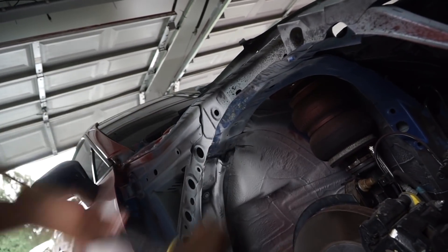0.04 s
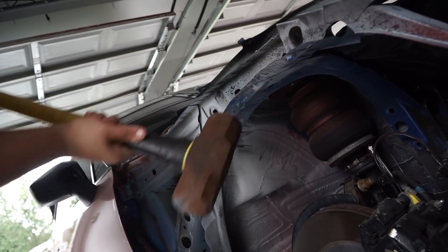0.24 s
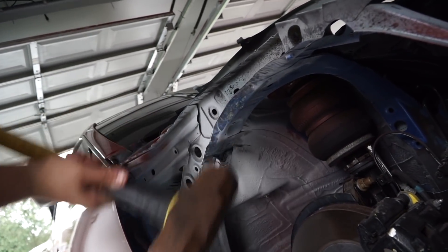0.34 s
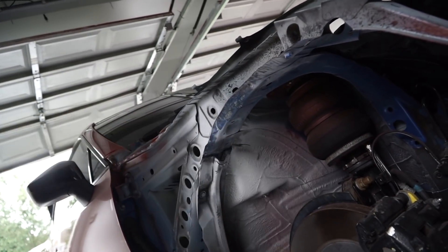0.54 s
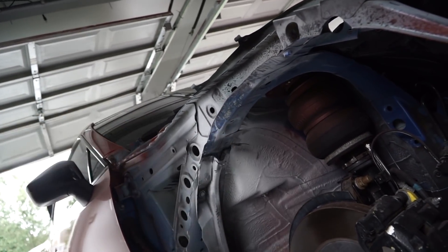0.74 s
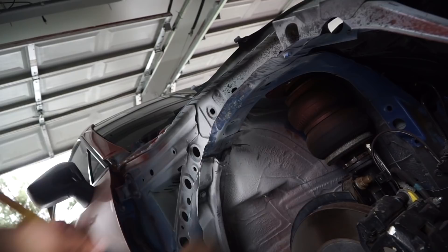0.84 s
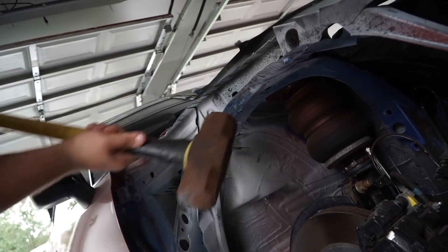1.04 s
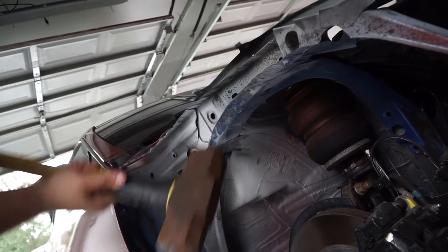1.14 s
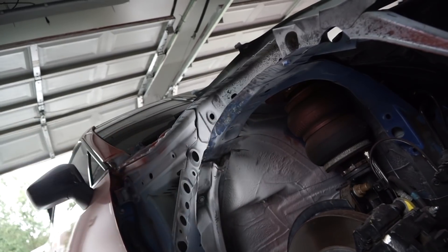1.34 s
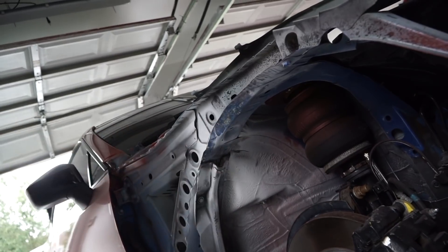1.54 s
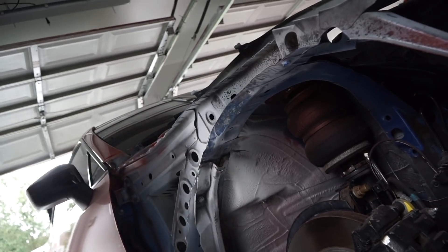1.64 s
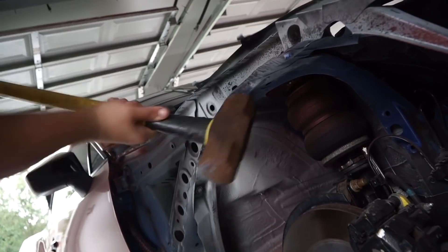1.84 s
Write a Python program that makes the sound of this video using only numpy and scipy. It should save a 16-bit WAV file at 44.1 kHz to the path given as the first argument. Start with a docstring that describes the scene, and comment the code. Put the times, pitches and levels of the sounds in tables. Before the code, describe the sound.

A sledgehammer slams a bare steel car frame twice, each blow clanging and ringing through a garage

```python
"""A sledgehammer strikes a bare steel car frame twice in a garage with its door open.
Filtered noise makes the rumble and a rustle that fades from the start, beside a faint hum of sines.
At 0.20 s and 1.04 s come the blows: damped noise clanks, frame and garage modes as dying sines, a dense wash.
A thin squeal of resonant noise follows the first blow, and fluttering tones squeak late after the second.
The recorder overloads on the clank, and its limiter holds the ring level before letting it die."""
import sys
import numpy as np
from scipy import signal
from scipy.fft import rfft, irfft
from scipy.io import wavfile

SR = 44100
rng = np.random.default_rng(int(sys.argv[2]) if len(sys.argv) > 2 else 0)


def wav_record(signal):
    """Record a signal, one row per channel, as 16-bit PCM in the file named by sys.argv[1]."""
    frames = np.transpose(np.atleast_2d(signal))
    bounded = np.clip(frames, -1, 1)
    # unit amplitude maps onto the largest positive 16-bit level
    quanta = np.round(bounded * 32767).astype(np.int16)
    wavfile.write(sys.argv[1], SR, quanta)


N = 83790
TIME = np.arange(N) / SR


def from_db(db):
    """Logarithmic level: 20 dB is a factor of ten in amplitude."""
    return 10 ** (np.asarray(db) / 20)


def rms_one(x):
    """Normalisation to unit root-mean-square amplitude."""
    return x / np.sqrt(np.mean(x ** 2) + 1e-20)


def at_hz(points, hz):
    """Interpolation on a logarithmic frequency axis."""
    table_hz, value = np.transpose(points)
    return np.interp(np.log(hz), np.log(table_hz), value)


def dying(age, t60):
    """Exponential decay: the amplitude falls by 60 dB in t60 seconds."""
    return np.exp(-np.log(1000) * age / t60)


def build_up(age, seconds):
    """Exponential build-up with a time constant in seconds."""
    return 1 - np.exp(-age / seconds)


def swell(start, length):
    """Half-sine envelope: a smooth rise and fall."""
    return np.sin(np.pi * np.clip((TIME - start) / length, 0, 1))


def smooth(x, seconds):
    """First-order relaxation: a one-pole low-pass."""
    pole = np.exp(-1 / (seconds * SR))
    return signal.lfilter([1 - pole], [1, -pole], x)


def resonance(x, hz, q):
    """Simple resonance: a band-pass with unit gain at its peak."""
    return signal.lfilter(*signal.iirpeak(hz, q, fs=SR), x)


def twice_resonant_noise(noise, hz, q):
    """Cascaded resonance: two equal band-passes narrow the noise, brought to rms 1."""
    return rms_one(resonance(resonance(noise, hz, q), hz, q))


def ring(modes, age, length=1):
    """Modal superposition: dying sines with alternating sign; length scales every t60."""
    total = 0
    for k, (hz, db, t60) in enumerate(modes):
        sign = (-1) ** k
        total = total + sign * from_db(db) * np.sin(2 * np.pi * hz * age) * dying(age, t60 * length)
    return total


RIPPLE_SPACING_HZ = 133


def noise_bands(spectrum, ripple_db):
    """Spectral shaping: coloured noise in overlapping octaves whose sum has rms 1; centres, bands."""
    hz = np.maximum(np.fft.rfftfreq(N, 1 / SR), 1)
    ripple = np.interp(hz / RIPPLE_SPACING_HZ, np.arange(2000), rng.standard_normal(2000))
    ripple = ripple * hz / (hz + 1000)  # weaker towards the bass
    coloured = rfft(rng.standard_normal(N)) * from_db(at_hz(spectrum, hz) + ripple_db * ripple)
    centres = 25 * 2. ** np.arange(11)
    bands = []
    for centre in centres:
        weight = np.maximum(1 - abs(np.log2(hz / centre)), 0)  # triangle on an octave axis
        bands.append(irfft(coloured * weight, N))
    bands = np.array(bands)
    return centres, bands / bands.sum(0).std()


# spectrum of background air and rumble: (frequency [Hz], relative density [dB per Hz])
AIR_SPECTRUM = [(25, 1), (50, -2.5), (78, 9.5), (120, -2), (180, -3.5), (260, -9), (370, -14),
                (1000, -19.5), (2500, -28), (4400, -26), (5100, -37), (9000, -48.5), (15000, -59.5)]
# gain of the background's treble: (time [s], level [dB])
TREBLE_GAIN = [(0, 8), (.12, -0.5), (.5, 10), (.78, 5.5), (.9, -2), (1.45, 3.5), (1.7, 3.5), (1.9, -6)]
# faint hum lines: (frequency [Hz], level at the start [dB], growth [dB/s])
HUM_LINES = [(176, -55, 2.5), (261, -55.5, 2.5), (278, -59, 7)]
AIR_DB, TREBLE_HZ = -39.5, 1200


def air():
    """Superposed stationary noise and steady tones: rumble, slowly growing hum, hiss of wandering level."""
    centres, bands = noise_bands(AIR_SPECTRUM, 0)
    rumble = bands[centres < TREBLE_HZ].sum(0)
    hiss = bands[centres >= TREBLE_HZ].sum(0) * from_db(np.interp(TIME, *np.transpose(TREBLE_GAIN)))
    hum = 0
    for hz, db, growth in HUM_LINES:
        phase = 2 * np.pi * (hz * TIME + rng.random())
        hum = hum + from_db(db + growth * TIME) * np.sin(phase)
    return hum + from_db(AIR_DB) * (rumble + hiss)


RUSTLE_DB, RUSTLE_HZ, RUSTLE_T60_S = -50, 5200, .5


def rustle():
    """Decaying band noise: a soft, bright rustle dies away from the start."""
    noise = twice_resonant_noise(rng.standard_normal(N), RUSTLE_HZ, 1)
    return from_db(RUSTLE_DB) * noise * dying(TIME, RUSTLE_T60_S)


TICK_DB, TICK_HZ, TICK_T60_S = 11, 8000, 0.0076  # steel meeting steel
CLANK_DB, CLANK_Q, CLANK_T60_S = 12.5, 0.93, 0.053
CONTACT_RISE_S = .0012  # time constant
SPOT_LOW_DB, SPOT_HIGH_DB, SPOT_T60_S = 11, 13.5, 0.03906  # the struck spot's two notes


def contact(age, clank_hz, low_hz, high_hz):
    """Impact excitation: a bright tick, a short, wide clank and two notes that the head damps quickly."""
    tick = rms_one(resonance(rng.standard_normal(N), TICK_HZ, 1)) * dying(age, TICK_T60_S)
    clank = twice_resonant_noise(rng.standard_normal(N), clank_hz, CLANK_Q) * dying(age, CLANK_T60_S)
    notes = ring([(low_hz, SPOT_LOW_DB, SPOT_T60_S), (high_hz, SPOT_HIGH_DB, SPOT_T60_S)], age)
    return (from_db(TICK_DB) * tick + from_db(CLANK_DB) * clank + notes) * build_up(age, CONTACT_RISE_S)


# modes of the frame: (frequency [Hz], relative level [dB], t60 before the blow's length factor [s])
FRAME_MODES = [(195.6, -11, 0.68), (222, -8.5, 0.78), (248, -8, 0.52), (309, -13, 0.76), (399, -3.5, 0.42),
               (461.7, -12.5, 0.42), (542.5, -3.5, 0.55), (674, -5.5, 0.64), (794.4, -7, 0.66),
               (924, -9, 0.78), (1143.6, -2.5, 0.62), (1389, -11.5, .7), (2655, -8.5, 0.35),
               (2740, -12, 0.49)]
FRAME_DB = -3


def frame(age, length):
    """Normal modes: the steel frame rings at its own frequencies."""
    return from_db(FRAME_DB) * ring(FRAME_MODES, age, length)


# dense ring of panels and garage: (frequency [Hz], relative density [dB per Hz])
WASH_SPECTRUM = [(25, -29.5), (45, -11.5), (70, -13), (110, -6), (155, 0), (200, -2.5), (290, -8),
                 (550, -3.5), (850, -7), (1200, -7.5), (1600, -14), (2400, -17), (4000, -17.5), (5200, -29),
                 (7200, -35), (9000, -34), (11000, -43.5), (15000, -49)]
# its decay: (frequency [Hz], t60 before the blow's length factor [s])
WASH_DECAY = [(60, 0.92), (200, 0.74), (600, 0.59), (1300, 0.61), (4000, 0.61), (12000, 0.46)]
WASH_DB = 6.5
WASH_RIPPLE_DB = 0.5  # the modes cluster unevenly


def wash(age, length):
    """High modal density: countless weaker modes of sheet steel and garage, as noise dying band by band."""
    total = 0
    for hz, band in zip(*noise_bands(WASH_SPECTRUM, WASH_RIPPLE_DB)):
        total = total + band * dying(age, at_hz(WASH_DECAY, hz) * length)
    return from_db(WASH_DB) * total


# low modes of the garage: (frequency [Hz], relative level [dB], t60 before shortening by 0.85 [s])
GARAGE_MODES = [(88.6, 9, 0.6), (110.56, 4.5, 0.48), (121.5, 9.5, 0.53), (138.7, -4.5, .5)]
GARAGE_BUILD_S = 0.092  # time constant


def garage(age):
    """Room modes: low resonances of the garage build up slowly, then decay."""
    return ring(GARAGE_MODES, age, 0.85) * build_up(age, GARAGE_BUILD_S)


BODY_RISE_S = 0.0037  # time constant
BOOM_Q, CLANG_Q = 2.4, 5.7


def blow(start, db, clank_hz, clank_db, boom_hz, boom_db, clang_hz, clang_db, length, low_hz, high_hz):
    """Position-dependent excitation: the struck spot decides which ranges boom and clang."""
    age = np.maximum(TIME - start, 0)
    body = (frame(age, length) + wash(age, length)) * build_up(age, BODY_RISE_S)
    for hz, boost_db, q in (boom_hz, boom_db, BOOM_Q), (clang_hz, clang_db, CLANG_Q):
        body = body + (from_db(boost_db) - 1) * resonance(body, hz, q)
    impact = from_db(clank_db) * contact(age, clank_hz, low_hz, high_hz)
    return from_db(db) * (body + garage(age) + impact)


# the two blows: (time [s], level before the limiter [dB], clank pitch [Hz], gain of the contact [dB],
# panel's boom [Hz], boom boost [dB], panel's clang [Hz], clang boost [dB], ring length factor [1],
# low note of the struck spot [Hz], its high note [Hz])
BLOW_EVENTS = [(0.2039, -5.12, 1287, 1, 499, 3.55, 1196, 3.2, 1.004, 444, 1470),
               (1.0392, -5.12, 1515, -1, 276.5, 8.6, 1600, 6.1, 0.98, 1011, 2030)]


def blows():
    """Linear superposition: the ring of both blows adds up."""
    return sum(blow(*event) for event in BLOW_EVENTS)


# resonances of the squeal: (frequency [Hz], relative level [dB])
SQUEAL_RESONANCES = [(1480, 4.5), (2245, 3.5), (3040, 3), (4330, -11), (5480, -14)]
SQUEAL_START_S, SQUEAL_LENGTH_S, SQUEAL_DB = 0.546, 0.16, -46.5
SQUEAL_WIDTH_HZ = 220  # of each of two band-passes in series


def squeal():
    """Friction excitation: rubbing, as noise, drives a few narrow resonances."""
    rub = rng.standard_normal(N)
    lines = 0
    for hz, db in SQUEAL_RESONANCES:
        lines = lines + from_db(db) * twice_resonant_noise(rub, hz, hz / SQUEAL_WIDTH_HZ)
    return from_db(SQUEAL_DB) * swell(SQUEAL_START_S, SQUEAL_LENGTH_S) * lines


SQUEAK_WAVER, SQUEAK_FLUTTER = 0.00428, 0.38  # rms fractions of pitch and of amplitude
SQUEAK_OCTAVE_DB = -21.5


def slow_noise():
    """Low-passed random fluctuation with rms 1."""
    return rms_one(smooth(smooth(rng.standard_normal(N), 0.0017), 0.0017))


def squeak(start, length, hz, glide, db):
    """Frequency and amplitude modulation: a short, thin, fluttering tone with a weak octave."""
    pitch = (hz + glide * np.clip(TIME - start, 0, length)) * (1 + SQUEAK_WAVER * slow_noise())
    phase = 2 * np.pi * np.cumsum(pitch) / SR
    tone = np.sin(phase) + from_db(SQUEAK_OCTAVE_DB) * np.sin(2 * phase)
    return from_db(db) * swell(start, length) * (1 + SQUEAK_FLUTTER * slow_noise()) * tone


# squeaks: (start [s], length [s], pitch [Hz], glide [Hz/s], level before flutter and echoes [dB])
SQUEAK_EVENTS = [(1.59, .055, 2020, 1000, -47), (1.636, .036, 2065, 900, -46), (1.664, .052, 2108, 0, -39),
                 (1.705, .04, 2100, 0, -45), (1.71, .07, 2025, -300, -43)]


def squeaks():
    """Linear superposition: brief tones follow and overlap one another."""
    return sum(squeak(*event) for event in SQUEAK_EVENTS)


ECHO_DB, ECHO_T60_S = -4.5, 0.6


def in_garage(x):
    """Reverberation by convolution: decaying noise of unit energy lets small sounds linger."""
    echoes = rng.standard_normal(N) * dying(TIME, ECHO_T60_S)
    echoes = echoes / np.linalg.norm(echoes)
    return x + from_db(ECHO_DB) * signal.fftconvolve(x, echoes)[:N]


def scene():
    """Linear superposition: blows and small squeals over the background."""
    return (air() + rustle() + blows() + in_garage(squeal() + squeaks()))[None]


LIMIT_DB, RELEASE_DB_PER_S = -6.5, 148
SENSE_S, ATTACK_S = 0.0065, 0.0051  # time constants


def limiter(x):
    """Feedback-free gain control: loud sound is turned down in milliseconds, with a steady release."""
    power_db = 10 * np.log10(smooth(x ** 2, SENSE_S) + 1e-12)
    over_db = np.maximum(power_db - LIMIT_DB, 0)
    release_db = RELEASE_DB_PER_S * TIME
    held_db = np.maximum.accumulate(over_db + release_db) - release_db
    return x * from_db(-smooth(held_db, ATTACK_S))


CUTOFF_HZ = 15900


def record(dry):
    """Nonlinear transmission: limiter and hard overload, then a steep low-pass."""
    clipped = np.clip(limiter(dry[0]), -1, 1)
    low_pass = signal.ellip(10, .1, 70, CUTOFF_HZ, fs=SR, output="sos")
    return signal.sosfilt(low_pass, clipped)[None]


dry = scene()
out = record(dry)
wav_record(out)
```